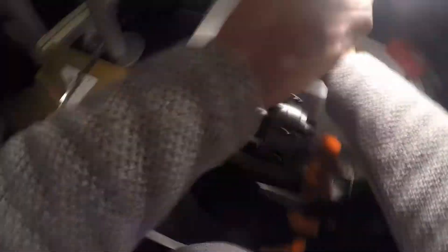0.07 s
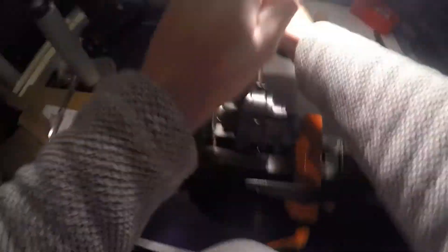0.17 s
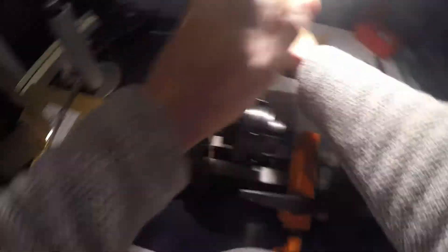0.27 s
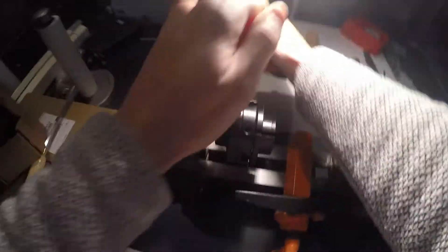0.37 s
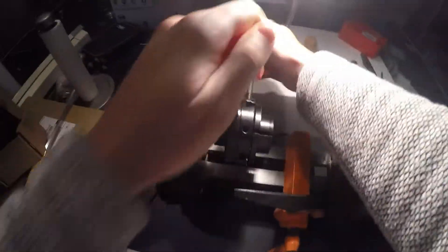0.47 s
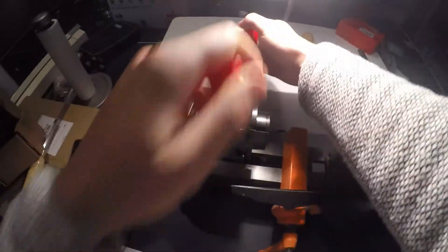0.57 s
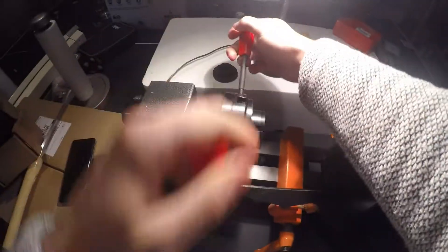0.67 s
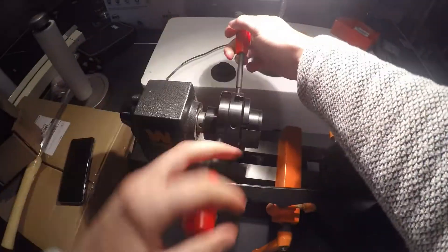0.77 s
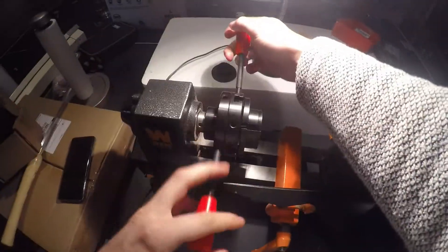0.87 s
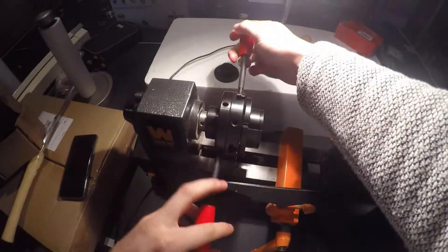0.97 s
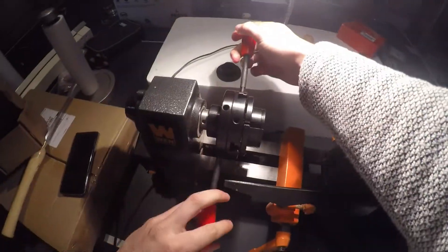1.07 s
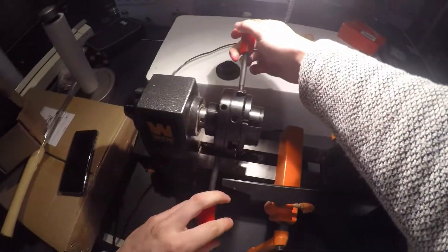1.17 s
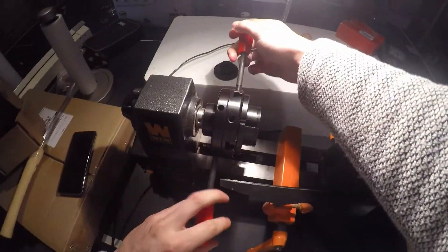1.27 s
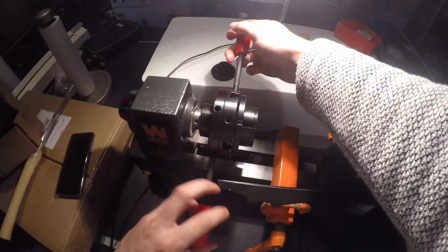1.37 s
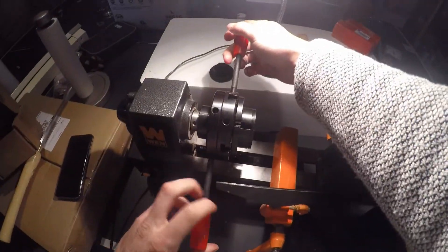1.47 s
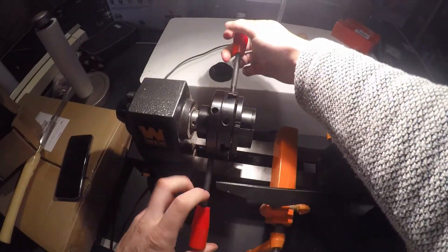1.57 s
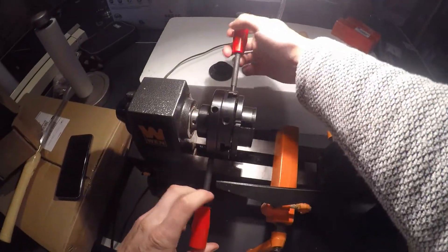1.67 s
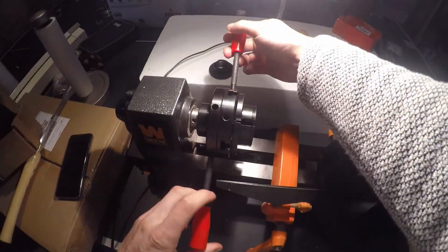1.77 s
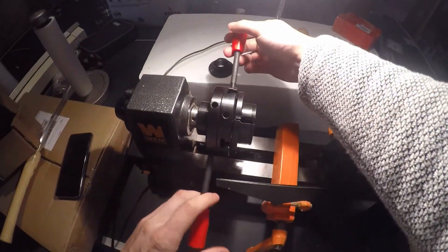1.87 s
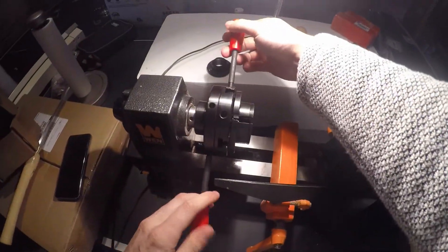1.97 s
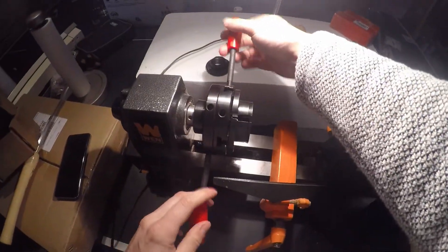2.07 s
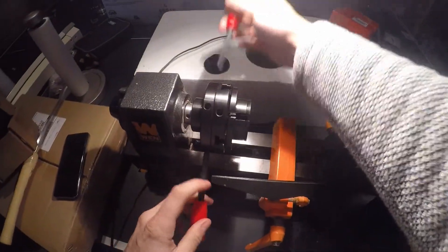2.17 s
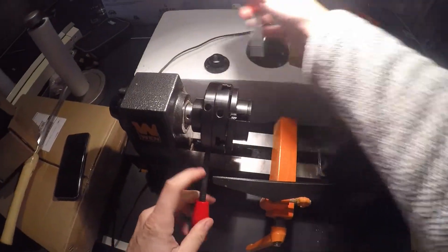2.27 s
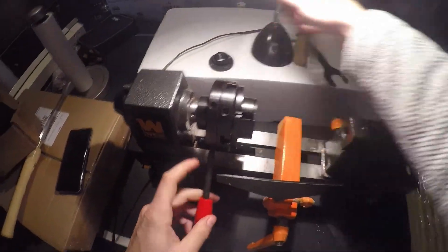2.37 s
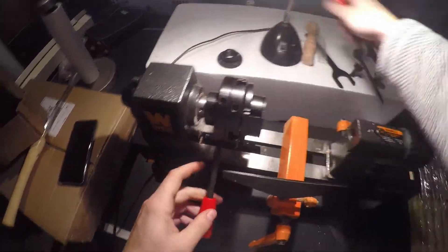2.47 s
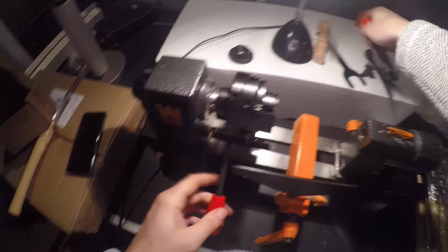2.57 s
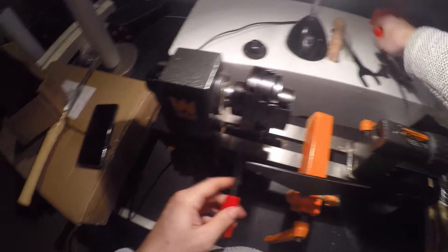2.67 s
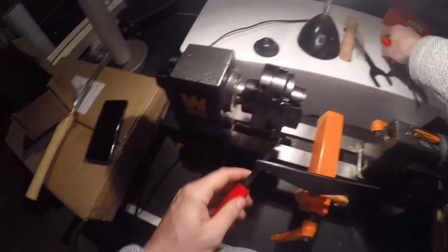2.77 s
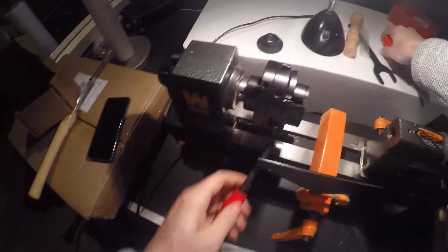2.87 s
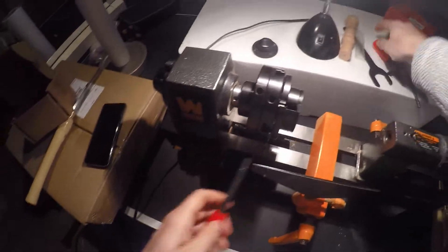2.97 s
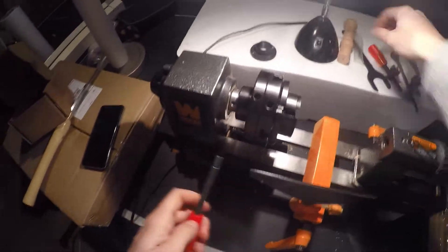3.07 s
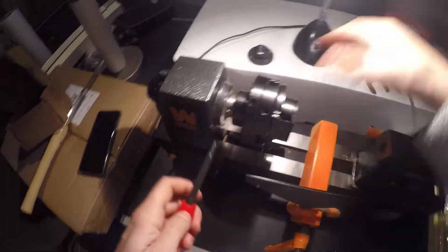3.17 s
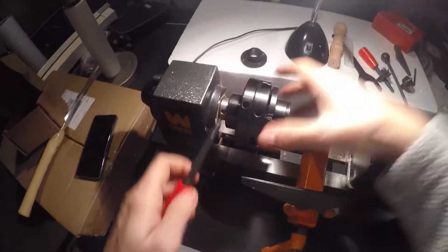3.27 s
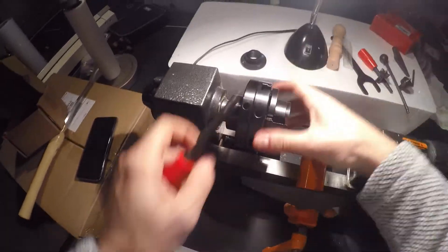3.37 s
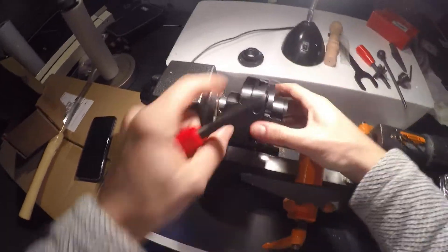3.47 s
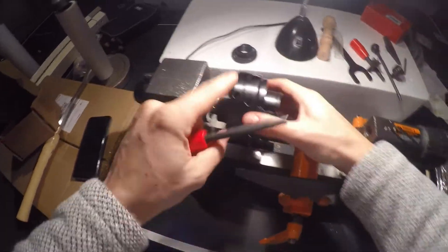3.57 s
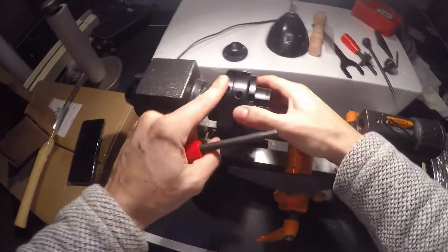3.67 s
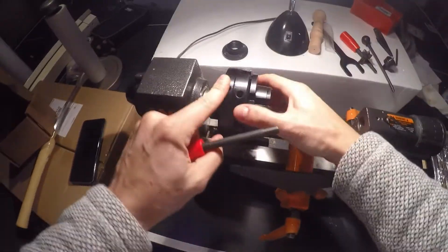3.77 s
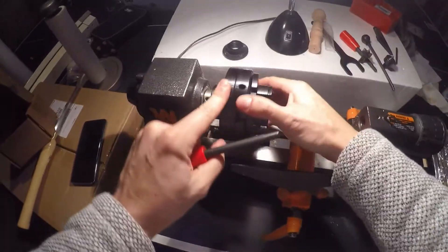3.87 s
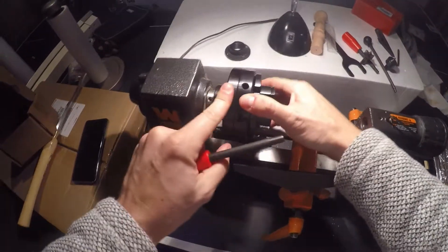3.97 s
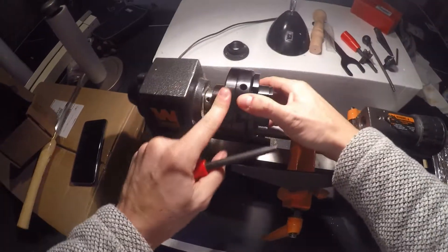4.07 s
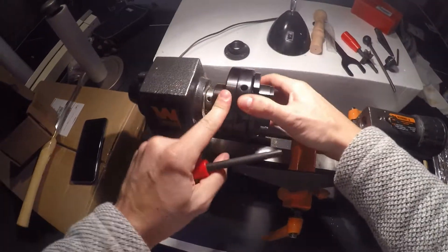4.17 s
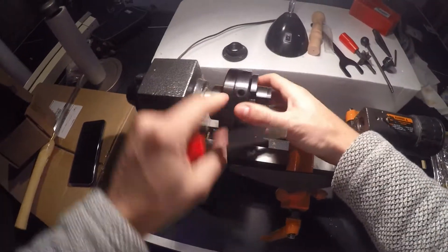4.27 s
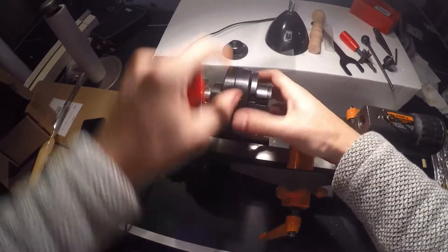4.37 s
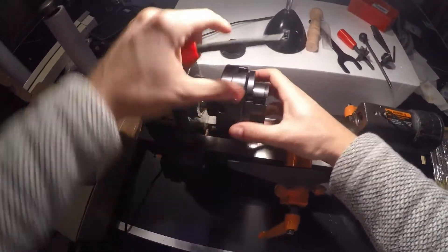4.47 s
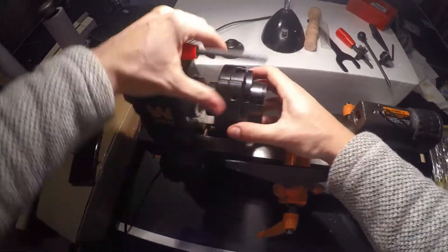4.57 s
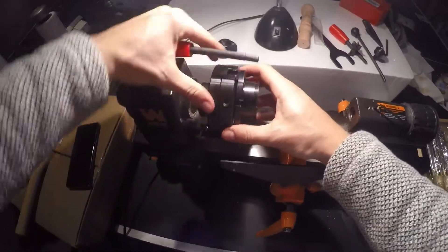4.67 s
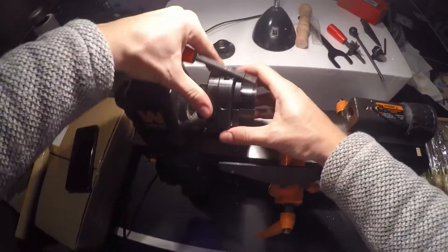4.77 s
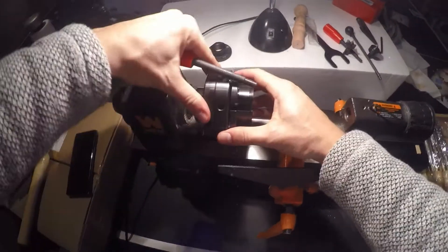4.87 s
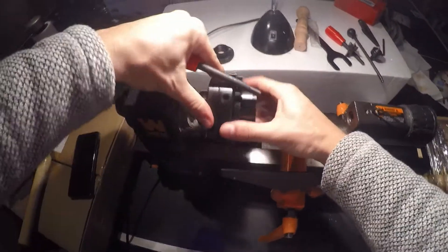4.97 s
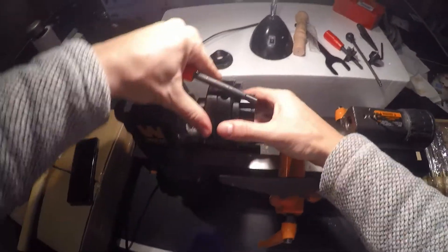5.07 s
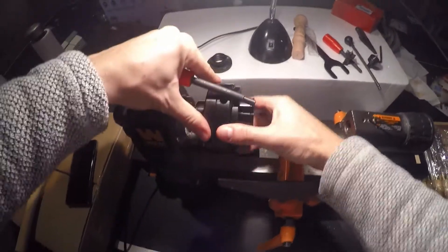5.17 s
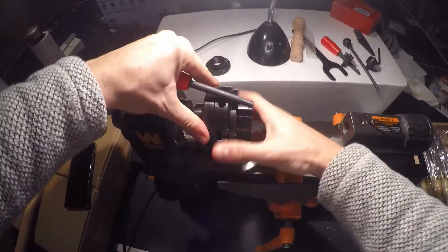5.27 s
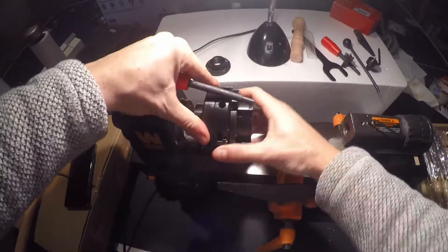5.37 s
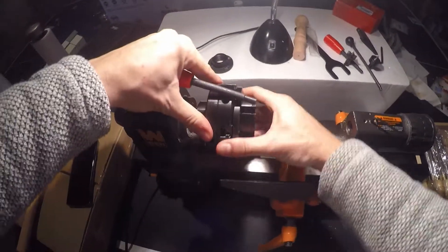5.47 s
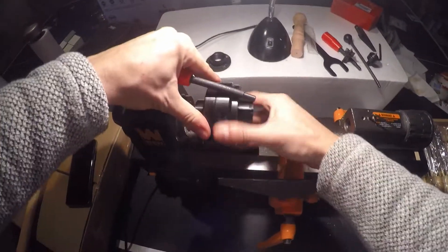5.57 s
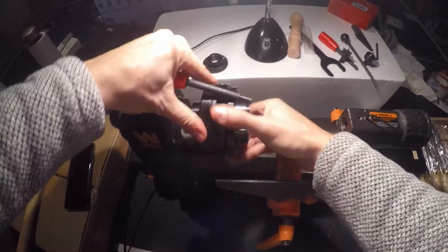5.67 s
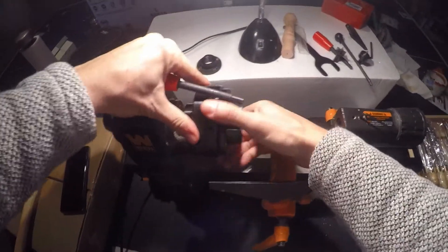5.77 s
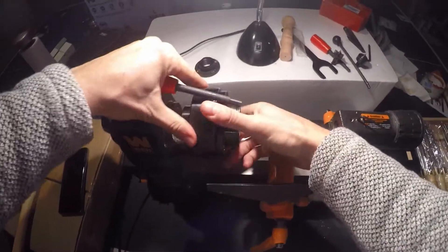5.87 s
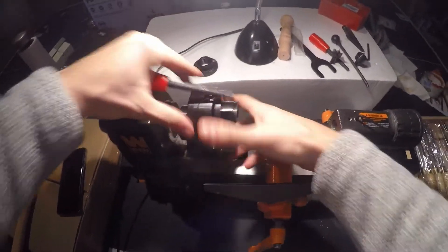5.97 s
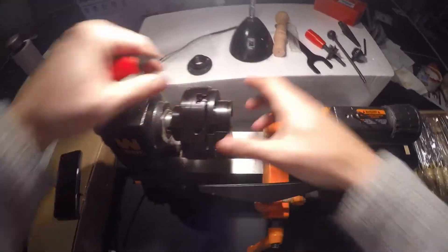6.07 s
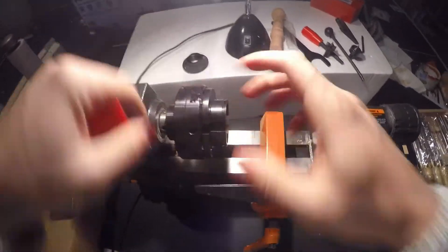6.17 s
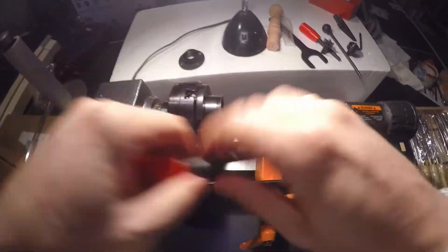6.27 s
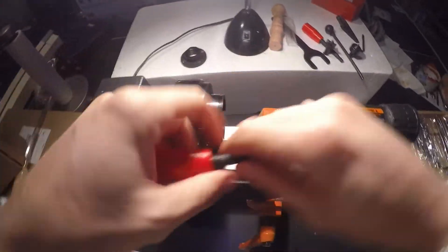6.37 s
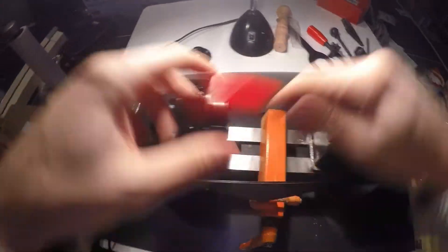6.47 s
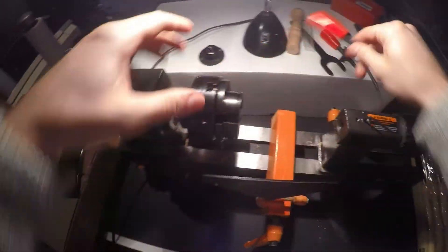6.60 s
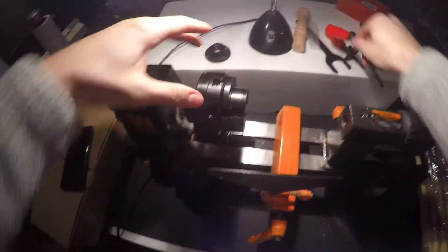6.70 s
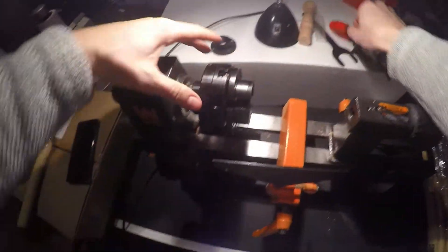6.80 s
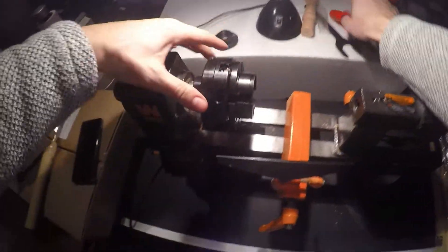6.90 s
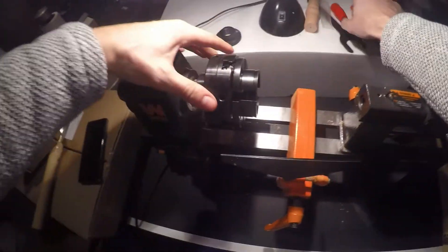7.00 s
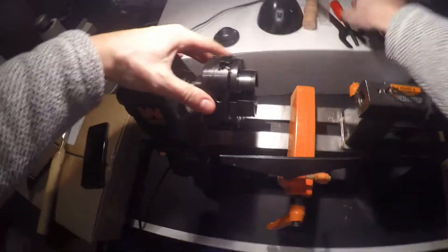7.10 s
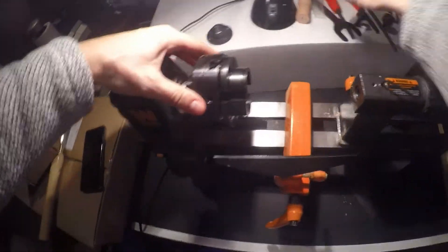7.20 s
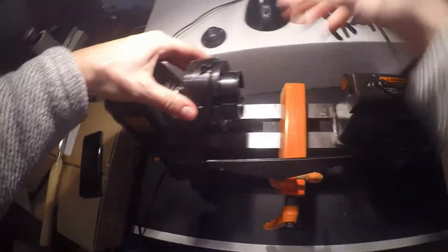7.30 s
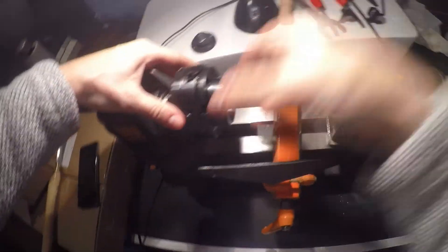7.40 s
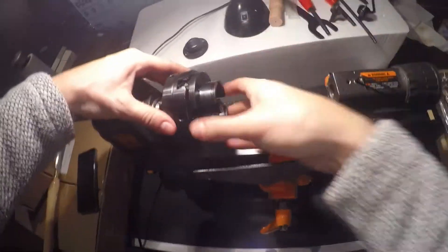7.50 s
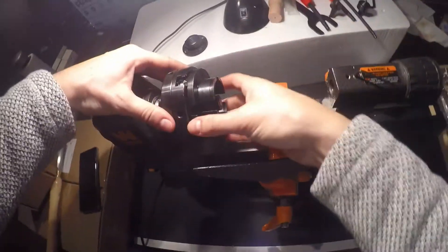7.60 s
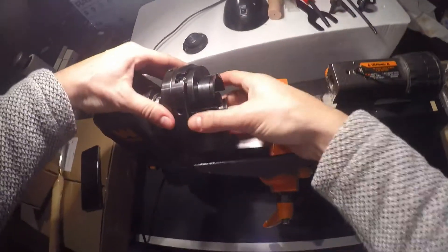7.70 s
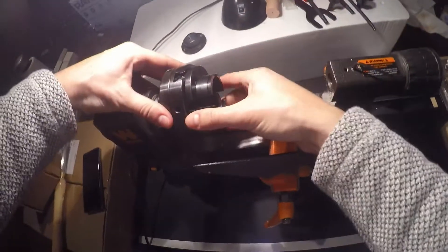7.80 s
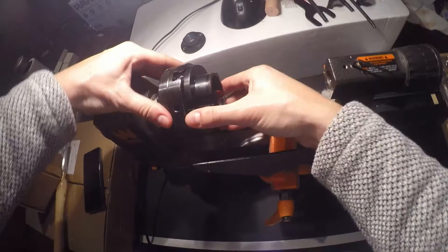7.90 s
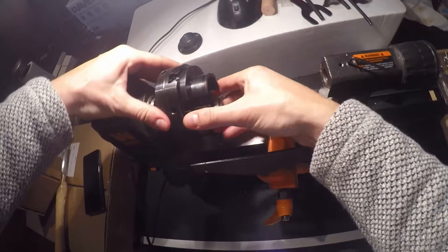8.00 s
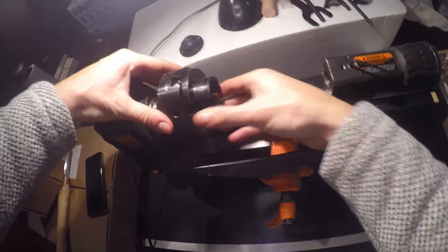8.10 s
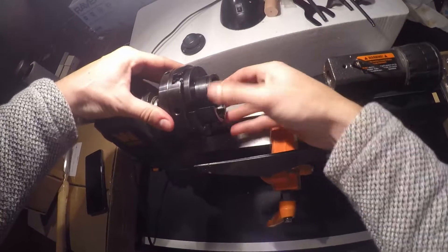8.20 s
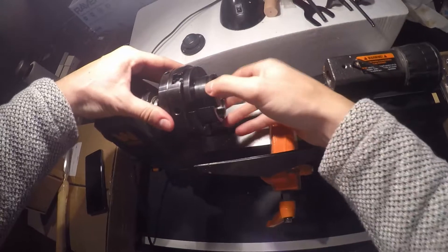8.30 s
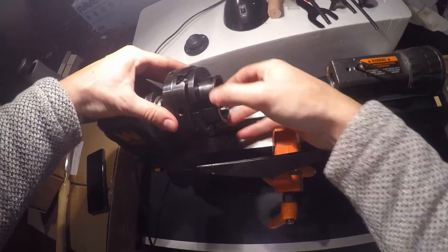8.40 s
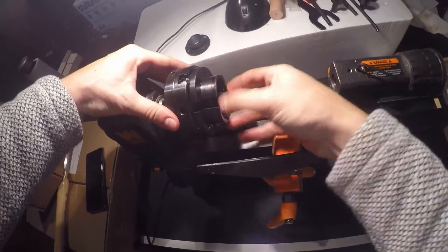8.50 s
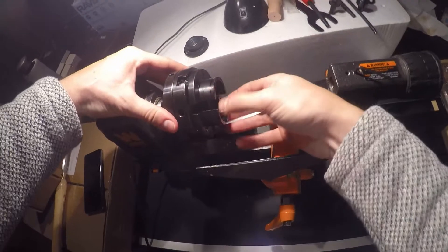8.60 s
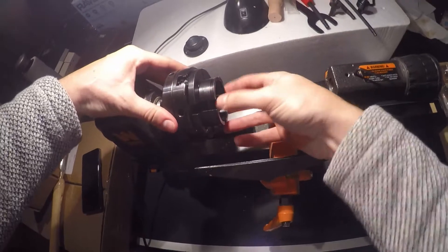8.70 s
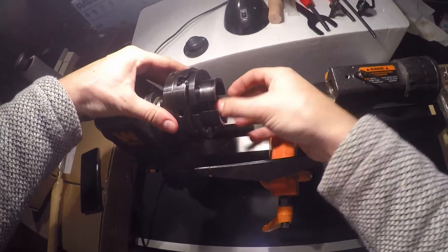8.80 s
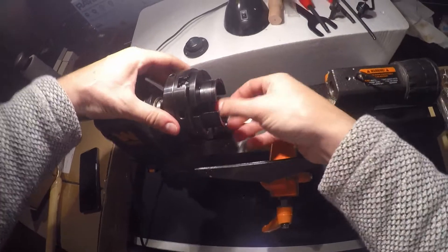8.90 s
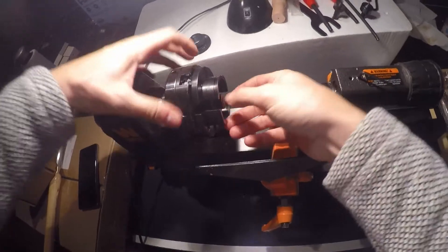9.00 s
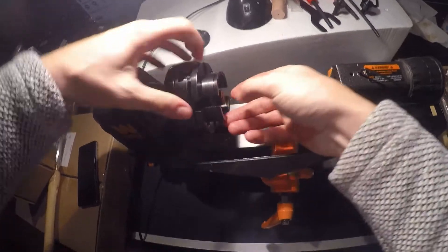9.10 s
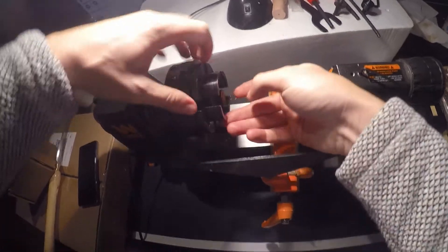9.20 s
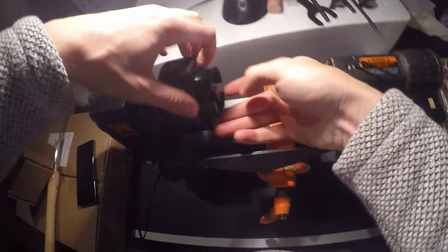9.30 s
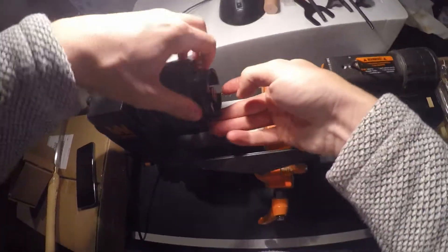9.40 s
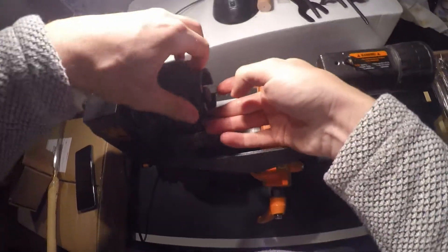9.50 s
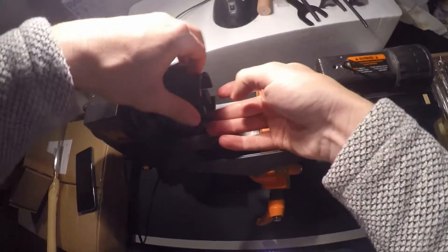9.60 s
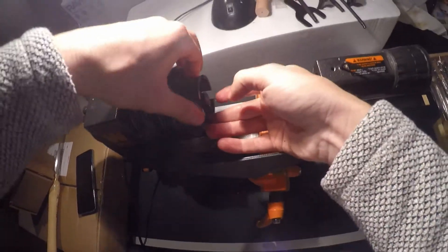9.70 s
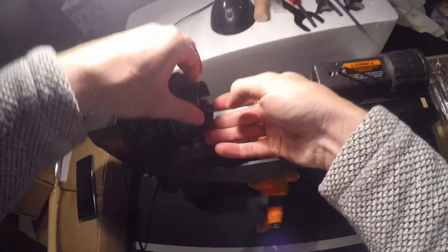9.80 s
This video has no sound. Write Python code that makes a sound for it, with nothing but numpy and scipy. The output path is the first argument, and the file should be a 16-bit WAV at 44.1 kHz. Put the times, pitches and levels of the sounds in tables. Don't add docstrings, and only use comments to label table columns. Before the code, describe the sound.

Over steady motor hum, rough cloth thumps, small metallic snaps and skin rubs, hollow tabletop knocks, and one loud ringing clang of dropped steel.

```python
import sys
import numpy as np
from scipy import signal
from scipy.fft import rfft, irfft
from scipy.io import wavfile
from scipy.ndimage import uniform_filter1d, map_coordinates

SR = 44100
rng = np.random.default_rng(int(sys.argv[2]) if len(sys.argv) > 2 else 0)


def dump_mix(stems):
    frames = np.atleast_2d(stems).T
    limited = np.clip(frames, -1, 1)
    pcm = np.round(limited * 32767).astype(np.int16)
    wavfile.write(sys.argv[1], SR, pcm)


def voltage_ratio(decibels):
    exponent = np.asarray(decibels, float) / 20
    return 10 ** exponent


N = 434385
TIME = np.arange(N) / SR
TOP_HZ = 15350


def unit(x):
    return x / np.sqrt(np.mean(x ** 2) + 1e-20)


def curves(rows):
    s, *cols = np.transpose(rows)
    return [np.interp(TIME, s, c) for c in cols]


def wobble(rate_hz):
    coarse_s = TIME[::16]
    knots = rng.standard_normal(int(N * rate_hz / SR) + 4)
    return np.interp(TIME, coarse_s, map_coordinates(knots, [coarse_s * rate_hz]))


def noise(points, size=N):
    f, v = np.transpose(points)
    hz = np.fft.rfftfreq(size, 1 / SR)
    gain = voltage_ratio(np.interp(np.log(hz + 1), np.log(f + 1), v)) * np.sqrt(SR / 2)
    return irfft(rfft(rng.standard_normal(size)) * gain, size)


def hump(hz, octaves, size):
    steps = [(-5, -90), (-2, -24), (-1, -8), (0, 0), (1, -8), (2, -24), (5, -90)]
    return unit(noise([(hz * 2 ** (k * octaves), db) for k, db in steps], size))


def rough_ring(t, hz, t60_s, rough):
    rate_hz, onset_s = 150, 0.015
    knots = rng.standard_normal((2, int(len(t) / SR * rate_hz) + 4))
    at = [t * rate_hz]
    scatter = map_coordinates(knots[0], at) + 1j * map_coordinates(knots[1], at)
    waver = 1 + rough * np.minimum(t / onset_s, 1) * scatter
    return voltage_ratio(-60 * t / t60_s) * np.imag(waver * np.exp(2j * np.pi * hz * t))


def patchy(x, depth_db):
    hz, t, z = signal.stft(x, SR, nperseg=1024)
    field = unit(uniform_filter1d(rng.standard_normal(z.shape), size=2, axis=1))
    edge_hz = TOP_HZ - 1500 * np.clip(np.interp(t, TIME, wobble(14)) - 0.6, 0, 2)
    thin = voltage_ratio(-14 * (hz[:, None] > edge_hz))
    return signal.istft(z * voltage_ratio(depth_db * field) * thin, SR, nperseg=1024)[1][:N]


def add(out, s, x):
    part = out[round(s * SR):][:len(x)]
    part += x[:len(part)]


def motors():
    # start in seconds, turns per second, level of the whining orders in dB.
    fan = [
        (0, 16.71, 0),
        (6.9, 16.705, 0),
        (7.2, 16.85, -7),
        (9.85, 16.85, -8),
    ]
    low_orders = {1: -45.5, 2: -42.5, 3: -34.5, 4: -44.5, 5: -50.5, 6: -48.5, 9: -55, 11: -50.5, 12: -58.5,
                  14: -53, 15: -61, 16: -61, 21: -55}
    whine_orders = {19: -53.5, 23: -57.5, 24: -42.5, 25: -57, 28: -64, 36: -67}
    pump_lines = {29.27: -36.5, 58.55: -40.5, 87.8: -55.5, 120: -52, 240: -57.5}
    # frequency in Hz, level in dB per Hz.
    air = [(10, -78), (22, -67.5), (42, -60), (56, -56), (72, -62), (140, -71.5), (300, -73), (450, -71.5),
           (560, -83), (750, -99), (1200, -101)]
    speed_hz, whine_db = curves(fan)
    turn = 2 * np.pi * np.cumsum(speed_hz) / SR

    def line(db, phase):
        return voltage_ratio(db + 1.5 + wobble(2.555)) * np.sin(phase + rng.uniform(0, 2 * np.pi))

    low = sum(line(db, k * turn) for k, db in low_orders.items())
    whine = sum(line(db + whine_db, k * turn) for k, db in whine_orders.items())
    pump = sum(line(db, 2 * np.pi * hz * TIME) for hz, db in pump_lines.items())
    return low + whine + pump + noise(air + [(3000, -140)])


def hiss():
    # time in seconds, level in dB.
    stir = [(0.4, -63.5), (1.82, -67), (2.77, -64), (6.27, -64), (7.22, -62), (7.4, -64.5), (9.85, -64.5)]
    # frequency in Hz, level in dB per Hz.
    colour = [(350, -13.5), (600, -2), (1040, -8.5), (1160, -15), (1260, -9.5), (1450, -11.5), (1730, -9.5),
              (3780, -12.5), (7410, -21), (14500, -25.5), (16000, -29)]
    lift_db = 2
    stir_db, = curves(stir)
    level = voltage_ratio(stir_db + lift_db + 0.85 * wobble(7.7))
    return level * unit(patchy(noise([(300, -69.5)] + colour), depth_db=4))


def rubs():
    # start in seconds, strength in dB, fizz over rasp in dB, length in seconds.
    slide_rows = [(0.81, -61.5, -4, 0.074), (.95, -59.5, -1, 0.14), (1.787, -67.5, 1, 0.15),
                  (1.97, -66, 2, .16), (2.438, -65.5, -5, 0.062), (3.142, -62.5, -4, 0.11),
                  (3.617, -67.5, 2, .085), (5.024, -55, -5, .11), (5.381, -55, -3, 0.083),
                  (6.296, -55, -5, 0.087), (6.421, -52.5, -2, 0.099), (7.579, -67.5, 10, .045),
                  (7.698, -62, -2, 0.091), (8.256, -59, -5, 0.1), (8.655, -57, 8.5, 0.087),
                  (8.773, -57.5, -2, .086), (8.995, -59, -4, 0.07), (9.58, -63, 4, 0.058),
                  (9.7, -75, 12, .056)]
    # start in seconds, level in dB, frequency in Hz, length in seconds.
    scrape_rows = [(2.843, -54, 3100, .043), (2.959, -53.5, 3940, 0.03), (3.227, -53, 2200, 0.079),
                   (3.871, -58, 1300, 0.049), (4.227, -57.5, 2300, .06), (6.128, -61, 1800, 0.043),
                   (9.801, -59, 2700, 0.045), (6.558, -57, 1800, 0.09), (6.817, -55, 3570, .035),
                   (7.246, -51, 2200, 0.098)]
    slide_hz, slide_octaves = 4300, 0.85
    scrape_fizz_db, scrape_octaves = -18, 0.6
    out, size = np.zeros(N), SR // 4
    t = np.arange(size) / SR
    slides = [(s, db, fizz_db, slide_hz, slide_octaves, length_s) for s, db, fizz_db, length_s in slide_rows]
    scrapes = [(s, db, scrape_fizz_db, hz, scrape_octaves, length_s) for s, db, hz, length_s in scrape_rows]
    for s, db, fizz_db, hz, octaves, length_s in slides + scrapes:
        u = t / length_s
        fizz_fade = (1 - np.exp(-t / 0.008)) * np.exp(-2.1 * u ** 0.89)
        fizz = voltage_ratio(fizz_db) * hump(12200, 1.0, size) * fizz_fade
        rasp = hump(hz, octaves, size) * 2.08 * u ** 0.8 * np.exp(-2.2 * u ** 2)
        add(out, s, voltage_ratio(db) * (fizz + rasp))
    return voltage_ratio(2.0 * wobble(110)) * patchy(out, depth_db=3.0)


def brush():
    # time in seconds, pressure in dB.
    drag_rows = [(0, -42), (.03, -48.5), (.06, -42.5), (.085, -40), (.112, -46), (.124, -54), (.16, -48.5),
                 (.18, -45), (.21, -50), (.3, -62), (.45, -78)]
    # centre in seconds, level in dB, frequency in Hz, length in seconds.
    jolt_rows = [(.005, -22, 69, .02), (0.05, -25, 154, 0.048), (0.084, -24.5, 420, 0.023),
                 (0.085, -32.5, 870, 0.022), (0.142, -26, 60, 0.016), (0.208, -24, 75, .025),
                 (0.212, -31.5, 368, 0.011), (0.268, -31, 350, 0.02), (0.302, -38.5, 80, 0.074)]
    full_fizz_db, fizz_growth = -54.5, 1.1
    size = SR // 2
    t, press_db = TIME[:size], curves(drag_rows)[0][:size]
    grit = voltage_ratio(2.6 * wobble(142))[:size]
    rasp = voltage_ratio(press_db) * (hump(1730, 1.0, size) + 0.31 * hump(5300, 0.25, size))
    fizz_db = full_fizz_db + fizz_growth * (press_db - press_db.max())
    drag = grit * (rasp + voltage_ratio(fizz_db) * hump(16000, 0.96, size))
    jolts = sum(voltage_ratio(db) * np.exp(-((t - s) / length_s) ** 2) * hump(hz, 0.45, size)
                for s, db, hz, length_s in jolt_rows)
    return np.pad((drag + jolts) * (t < drag_rows[-1][0]), (0, N - size))


def swells():
    # centre in seconds, level in dB, frequency in Hz, half length in seconds.
    notes_sung = [(.1065, -13, 448.4, 0.0034), (.19, -22, 400, 0.0039), (0.231, -18.5, 520, 0.0027),
                  (2.945, -52, 1710, .006), (2.971, -49, 1720, 0.014), (2.567, -53, 4870, .005),
                  (5.055, -61, 3830, .012), (5.638, -59, 5180, .01), (5.641, -55, 4720, .006),
                  (5.708, -59, 4050, .007), (7.02, -39.5, 600, .008)]
    out, size = np.zeros(N), SR // 10
    t = np.arange(size) / SR
    mid_s = t[size // 2]
    for s, db, hz, half_s in notes_sung:
        note = rough_ring(t, hz, t60_s=5, rough=0.45)
        add(out, s - mid_s, voltage_ratio(db) * np.exp(-((t - mid_s) / half_s) ** 2) * note)
    return out


def ticks():
    # start in seconds, peak in dB, frequency in Hz, crack width in octaves.
    tap_rows = [(.0285, -44, 7000, .59), (0.1017, -14.5, 1680, 0.67), (.109, -39, 5500, .6),
                (.1655, -29, 1190, 0.6), (.175, -38, 6500, .5), (0.227, -36.5, 2400, 0.34),
                (2.133, -49, 6500, .4), (2.6373, -57, 7860, .3), (2.7405, -48, 12800, .25),
                (2.7405, -58, 4700, .3), (2.987, -40, 2500, 0.85), (2.992, -41, 1800, 0.45),
                (4.0102, -49, 2580, 0.65), (4.1574, -60, 13500, .3), (4.3914, -53, 2590, .8),
                (5.241, -52.5, 2600, .95), (5.6485, -45, 4000, .5), (5.651, -46, 2800, .8),
                (5.6605, -42, 2200, 0.89), (5.677, -49, 4300, .4), (5.677, -55, 2400, .4),
                (5.8328, -42, 3120, 0.73), (6.808, -48, 5000, 0.97), (6.809, -34, 2050, .35),
                (6.9275, -44, 2500, 1.1), (7.046, -22.5, 9000, .4), (7.042, -40, 3000, 1.1),
                (7.014, -42, 3000, .9), (8.663, -48, 11000, .7)]
    # start in seconds, peak in dB, frequency in Hz, t60 in seconds.
    clink_rows = [(.1028, -24, 1000, .02), (.106, -32, 2300, .02), (.174, -33, 2000, .015),
                  (0.1747, -23.5, 5140, 0.04), (0.1748, -31.5, 3700, 0.018), (.1755, -31, 3070, .015),
                  (.19, -45, 5200, .06), (.18, -54, 5140, 0.28), (.229, -33, 900, 0.025),
                  (2.1335, -54, 2100, .06), (4.382, -53, 2360, .03), (5.187, -53, 2350, .045),
                  (5.08, -53, 2100, .03), (5.4225, -47.5, 7940, .025), (5.6597, -36.5, 4950, .028),
                  (5.663, -46, 3900, .04), (6.808, -35.5, 3600, .04), (6.816, -42.5, 3500, .05),
                  (6.812, -43, 910, .03), (6.9275, -38.5, 900, .03)]
    tap_ring_db, tap_t60_s = -12.5, 0.018
    clink_ring_db, clink_band_hz, widest_octaves = -4, 790, 0.61
    crack_s, crack_cycles = 0.016, 90
    out, size = np.zeros(N), SR // 5
    t = np.arange(size) / SR
    taps = [(s, db, hz, tap_t60_s, tap_ring_db, octaves) for s, db, hz, octaves in tap_rows]
    clinks = [(s, db, hz, t60_s, clink_ring_db, min(clink_band_hz / hz, widest_octaves))
              for s, db, hz, t60_s in clink_rows]
    for s, db, hz, t60_s, ring_db, octaves in taps + clinks:
        snap = 3.4 * np.exp(-2 * hz * octaves * t) * np.sin(2 * np.pi * hz * t)
        direct = voltage_ratio(0.5 - 60 * t / min(crack_s, crack_cycles / hz))
        echo = voltage_ratio(-25.5 - 60 * t / 0.1)
        crack = snap + hump(hz, octaves, size) * (direct + echo)
        ring = voltage_ratio(ring_db) * rough_ring(t, hz, t60_s, rough=0.7)
        add(out, s, voltage_ratio(db - 3.0) * (crack + ring) * (1 - np.exp(-t / 0.000082)))
    return out


def pings():
    # start in seconds, peak in dB, t60 in seconds, snap over ring in dB.
    jaw_snaps = [(2.549, -50, .04, -8), (2.556, -54, .04, -12), (2.565, -39.5, 0.045, -14),
                 (2.6371, -43, .04, -10), (2.646, -46, .05, -14), (5.0794, -26, 0.043, -4),
                 (5.1025, -41.5, .055, -6), (5.4224, -23, 0.037, -2), (5.45, -40, 0.045, -4)]
    chuck_hz = 4100
    out, size = np.zeros(N), SR // 3
    t = np.arange(size) / SR
    for s, db, t60_s, snap_db in jaw_snaps:
        bright = hump(4840, 0.17, size) + 0.45 * hump(4500, 0.6, size)
        echo = voltage_ratio(-28.5 - 60 * t / 0.092) * hump(3000, 0.79, size)
        snap = voltage_ratio(snap_db - 60 * t / 0.0063) * bright + echo
        tail = voltage_ratio(-43) * rough_ring(t, chuck_hz, 0.4, rough=1.6)
        ring = rough_ring(t, chuck_hz, t60_s, rough=0.12) + tail
        add(out, s, voltage_ratio(db) * (snap + ring) * (1 - np.exp(-t / 0.00025)))
    return out


def knocks(blows, modes, focus_s, db, tail_db, tail_t60_s):
    # frequency in Hz, level in dB per Hz.
    panel = [(60, -22), (120, -6), (200, 9), (450, 8.5), (600, -15.5), (1000, -27.5), (2500, -39),
             (6000, -57), (15000, -58)]
    out, size = np.zeros(N), SR // 2
    t = np.arange(size) / SR
    rise = np.sin(np.pi / 2 * np.minimum(t / focus_s, 1)) ** 2
    ring = sum(voltage_ratio(level_db - 60 * t / t60_s) * np.cos(2 * np.pi * hz * (t - focus_s))
               for hz, level_db, t60_s in modes)
    for s, peak_db in blows:
        rumble = voltage_ratio(tail_db - 60 * t / tail_t60_s) * unit(noise(panel, size))
        add(out, s, voltage_ratio(peak_db + db) * rise * (ring + rumble))
    return out


def table():
    # start in seconds, peak in dB.
    settle = [
        (2.837, -15),
    ]
    drop = [
        (2.987, -1),
        (3.035, -8.5),
    ]
    roll = [
        (6.809, -6.5),
        (6.928, -5.5),
    ]
    slam = [
        (7.045, 8),
        (7.086, -6.5),
    ]
    bump = [
        (0.033, -19.5),
        (0.101, -18.5),
        (0.186, -20),
    ]
    # frequency in Hz, level in dB, t60 in seconds.
    settle_spot = [(136, -11, 1.9), (214, 1.5, 0.18), (384, -5, 0.94), (420, -25, 0.25), (467, -22, 0.18),
                   (520, -8, 0.47)]
    drop_spot = [(125.4, -10, 0.54), (215.3, -9, 0.44), (244.6, -10, 0.45), (301, 7, 0.093),
                 (323, -3.5, 0.22), (397, -6.5, .15), (463, -7.5, 0.12), (528, -16, 0.33)]
    roll_spot = [(126, -17, 0.53), (227, -15.5, 0.16), (274, -15, 0.44), (313.4, 1.5, 0.17), (395, 2, 0.13),
                 (491, -10.5, 0.19), (506, -22.5, 0.26)]
    slam_spot = [(123.7, -10, 0.34), (213, 1, 0.12), (262.6, -6, 0.26), (334.3, -2, 0.21), (381, 0.5, 0.18),
                 (400, -10, 0.28), (476, -10.5, 0.24), (540, -11, 0.096), (577, -17.5, 0.17),
                 (773, -9.5, 0.07)]
    bump_spot = [(81.9, -2.5, 0.4), (215, -19, 0.035), (416, 8.5, 0.02), (940, 1, 0.012)]
    return (knocks(settle, settle_spot, focus_s=0.00384, db=-9, tail_db=0, tail_t60_s=0.61)
            + knocks(drop, drop_spot, focus_s=0.00597, db=-9.5, tail_db=-1.9, tail_t60_s=0.21)
            + knocks(roll, roll_spot, focus_s=0.00707, db=-8, tail_db=-6.5, tail_t60_s=0.25)
            + knocks(slam, slam_spot, focus_s=0.00519, db=-14.5, tail_db=2.5, tail_t60_s=0.2)
            + knocks(bump, bump_spot, focus_s=0.00384, db=-2.5, tail_db=-6.5, tail_t60_s=0.26))


def bar(blows, modes, ring_db, crack_t60_s, room_db, room_t60_s, dull_db, rough):
    # frequency in Hz, level in dB per Hz.
    scatter = [(300, -22), (900, -6), (2200, 12.5), (5000, 9.5), (8000, 3.5), (15000, -17.5)]
    colour = [(hz, db + dull_db * np.log2(max(hz / 5000, 1))) for hz, db in scatter]
    out, size = np.zeros(N), SR * 2 // 5
    t = np.arange(size) / SR
    for s, db in blows:
        ring = sum(voltage_ratio(level_db) * rough_ring(t, hz, t60_s, rough * (hz / 5000) ** 0.4)
                   for hz, level_db, t60_s in modes)
        fade = voltage_ratio(-4.5 - 60 * t / crack_t60_s) + voltage_ratio(room_db - 60 * t / room_t60_s)
        crack = fade * unit(noise(colour, size))
        add(out, s, voltage_ratio(db) * (voltage_ratio(ring_db) * ring + crack) * (1 - np.exp(-t / 0.00046)))
    return out


def keys():
    # start in seconds, peak in dB.
    pull = [(2.145, -44), (2.149, -39), (2.154, -41), (2.158, -38), (2.161, -36), (2.166, -39),
            (2.179, -49)]
    lay = [
        (2.836, -15),
    ]
    touch = [
        (3.1212, -35),
        (3.139, -43),
    ]
    clang = [
        (7.0452, -6),
        (7.0865, -22),
    ]
    # frequency in Hz, level in dB, t60 in seconds.
    pull_bar = [(2200, -11, .03), (3420, -1.5, 0.023), (3650, 1.5, 0.021), (3440, -25, 0.18),
                (5300, -25, 0.017), (7120, -6.5, 0.017), (9350, -16, .02), (12230, -26, .02)]
    lay_bar = [(920, -2, 0.15), (1243, -2.5, 0.12), (1710, 2, .13), (1720, -19, .6), (2140, -13, .1),
               (2550, 2, .08), (2780, 1, .07), (3010, 5, 0.075), (3130, -10, 0.28), (3400, -1, .07),
               (3800, -16, .45), (4080, -15, 0.27), (4870, 4, 0.046), (4780, -14, 0.35), (5060, -20, .27),
               (5270, -18, 0.17), (5950, -15, .14), (6304, -24, .3), (7700, -20, .1), (8053, -17.5, .15),
               (8400, -22, .15), (14570, -32, .07)]
    touch_bar = [(1880, -16, .06), (3700, 8, 0.037), (9868, -16, .12), (9820, -29, 2), (3500, -1, 0.079),
                 (6400, -7, .02)]
    clang_hz = [1340, 1717, 2140, 2476, 2554, 2597, 2670, 2779, 3047, 3930, 4252, 4298, 4371, 4777, 5735,
                6029, 6104, 6272, 6951, 6987, 7154, 8129, 9280, 9300, 10887, 12140, 12565, 13770, 14910]
    # level in dB, t60 in seconds.
    clang_fade = [(-21.5, 0.32), (-20, 0.23), (-18.5, .096), (-24.5, .2), (-15.5, 0.27), (-4.5, 0.26),
                  (-16, .3), (-22.5, .2), (-28.5, 0.36), (-31.5, .15), (-4, 0.23), (-9.5, 0.28), (-12, .17),
                  (-16.5, .1), (-22, .14), (-20.5, 0.16), (-24, .36), (-28, 0.32), (4.5, 0.094), (-22, .33),
                  (-11, .1), (-25.5, .14), (-11.5, 0.12), (-32, .36), (-18.5, .15), (-27, .17), (-25, .18),
                  (-39, .3), (-29, .15)]
    clang_bar = [(hz, db, t60_s) for hz, (db, t60_s) in zip(clang_hz, clang_fade)]
    rest, free = 0.9, 0.65
    return (bar(pull, pull_bar, 0, 0.0068, room_db=-22, room_t60_s=0.12, dull_db=-1.5, rough=rest)
            + bar(lay, lay_bar, -22.5, 0.03, room_db=-35, room_t60_s=0.63, dull_db=-9.5, rough=rest)
            + bar(touch, touch_bar, -9.5, 0.012, room_db=-21, room_t60_s=0.15, dull_db=-9, rough=rest)
            + bar(clang, clang_bar, -11.5, 0.025, room_db=-21.5, room_t60_s=0.21, dull_db=-3.0, rough=free))


def scene():
    background = motors() + hiss()
    handling = rubs() + brush() + swells() + ticks()
    return (background + handling + pings() + table() + keys())[None]


def sensor_blips():
    frame_hz, first_s, tone_hz = 29.965, 0.0017, 8545
    off = ((TIME - first_s) * frame_hz + 0.5) % 1 - 0.5
    pulse = np.exp(-(off / 0.0664) ** 2)
    return voltage_ratio(-67.5 + 0.9 * wobble(30)) * pulse * np.sin(2 * np.pi * tone_hz * TIME)


def starve(x, low_hz, count):
    # centre in seconds, length in seconds.
    starved = [(.803, .02), (1.335, .022), (1.525, .02), (3.445, .022), (3.622, .025), (3.7, .022),
               (4.92, .022), (5.583, .025), (5.643, .013), (6.116, .028), (6.797, .022), (7.204, .022),
               (8.077, .02), (8.14, .022), (8.982, .035), (9.231, .024), (9.805, .024)]
    out = x.copy()
    for s, length_s in starved:
        size = round(1.25 * length_s * SR)
        start = round(s * SR) - size // 2
        z = rfft(x[start:start + size] * signal.windows.tukey(size, 0.75))
        treble = z * (np.fft.rfftfreq(size, 1 / SR) > low_hz)
        weak = abs(treble) < np.sort(abs(treble))[-count]
        out[start:start + size] -= irfft(treble * weak, size)
    return out


def band_limit(x):
    return signal.sosfilt(signal.butter(12, 16340, fs=SR, output="sos"), x)


def record(dry):
    # frequency in Hz, width in Hz, gain in dB.
    housing = [(3840, 130, 1.5), (5040, 760, 3.5)]
    hz = np.fft.rfftfreq(N, 1 / SR)
    case = voltage_ratio(sum(db / (1 + (2 * (hz - mode_hz) / width_hz) ** 2) for mode_hz, width_hz, db in housing))
    x = irfft(rfft(dry[0]) * case, N) + sensor_blips()
    x = x / (1 + abs(x) ** 8) ** (1 / 8)
    band = voltage_ratio(-np.clip((hz - TOP_HZ) / 12, 0, 40))
    x = irfft(rfft(starve(x, low_hz=1110, count=11)) * band, N)
    return band_limit(x[None])


dry = scene()
out = record(dry)
dump_mix(out)
```